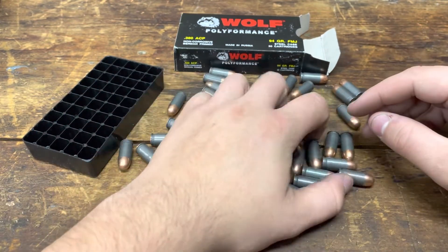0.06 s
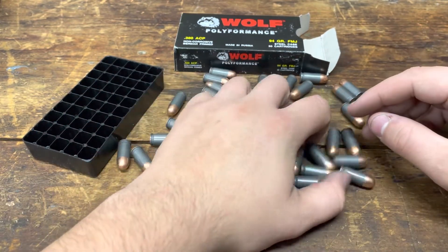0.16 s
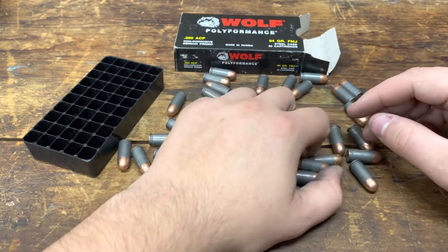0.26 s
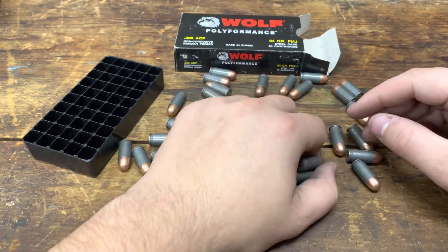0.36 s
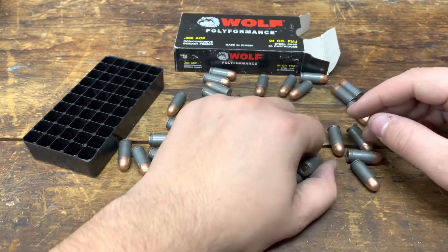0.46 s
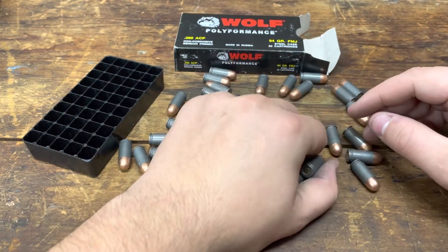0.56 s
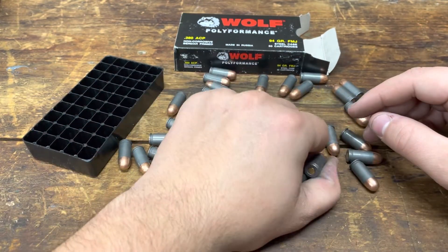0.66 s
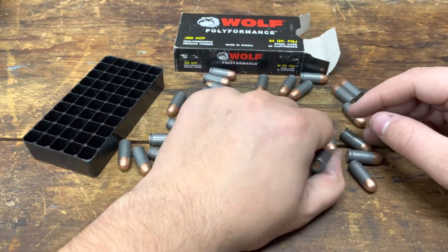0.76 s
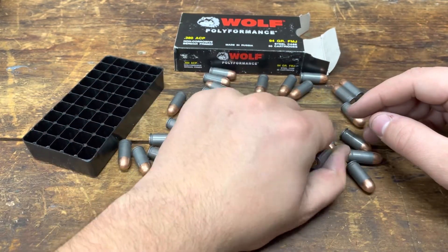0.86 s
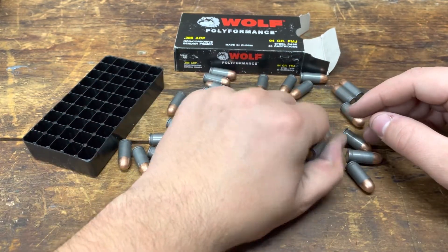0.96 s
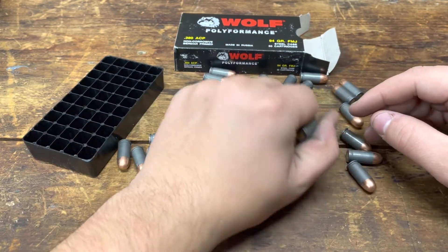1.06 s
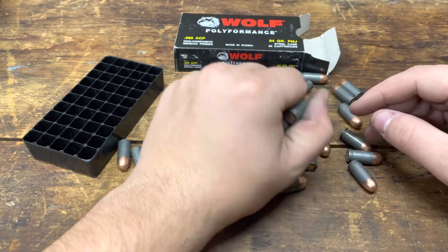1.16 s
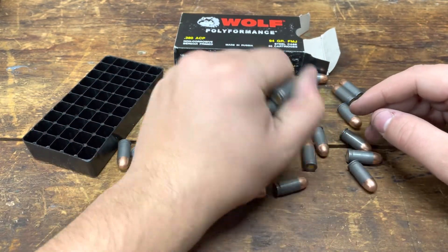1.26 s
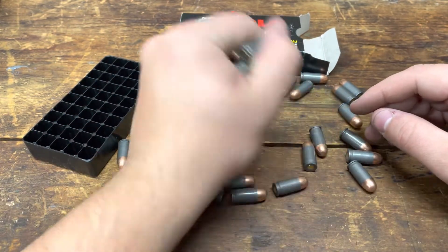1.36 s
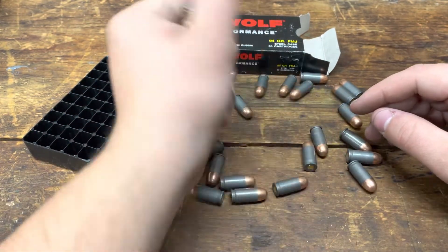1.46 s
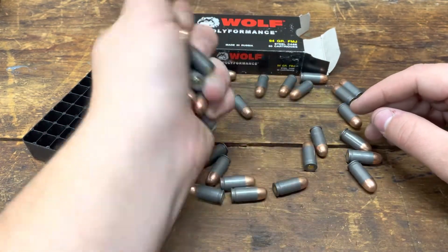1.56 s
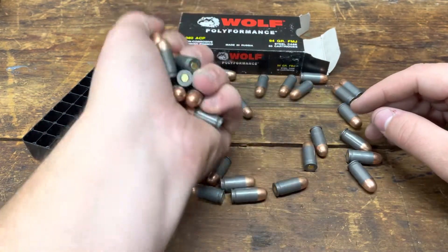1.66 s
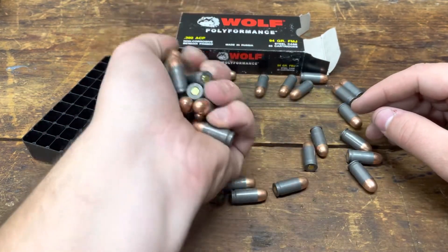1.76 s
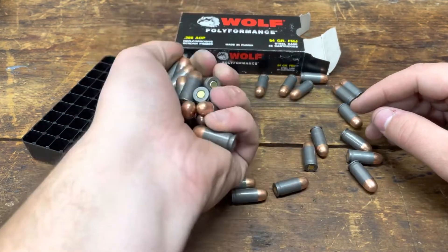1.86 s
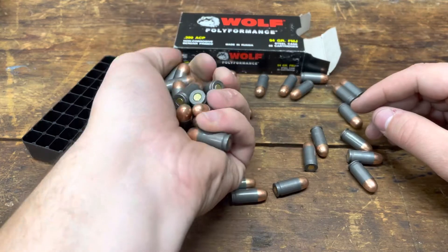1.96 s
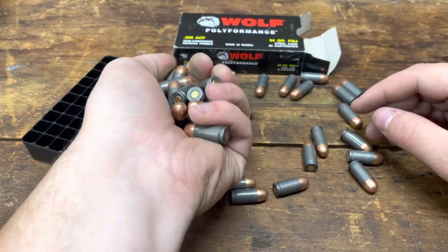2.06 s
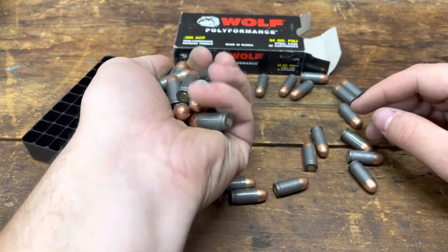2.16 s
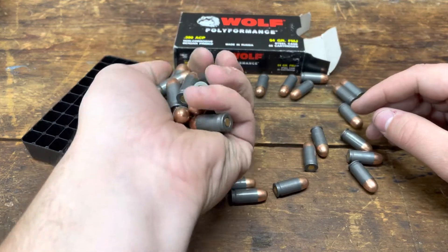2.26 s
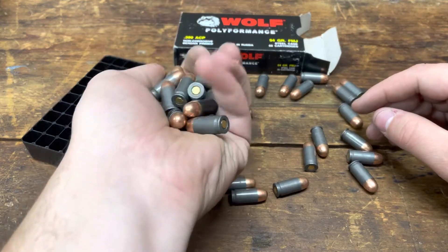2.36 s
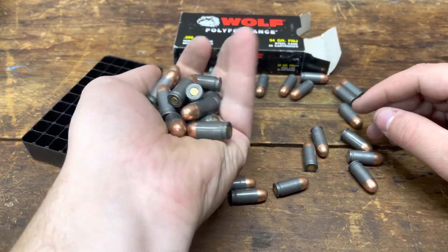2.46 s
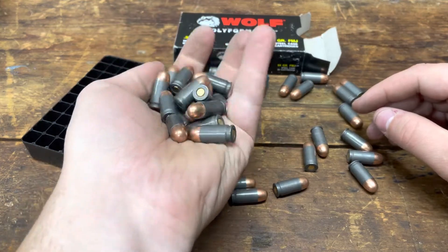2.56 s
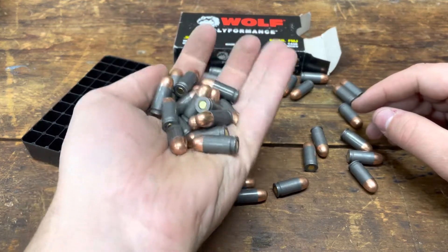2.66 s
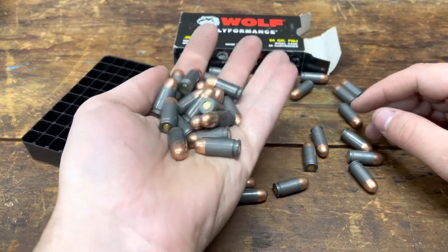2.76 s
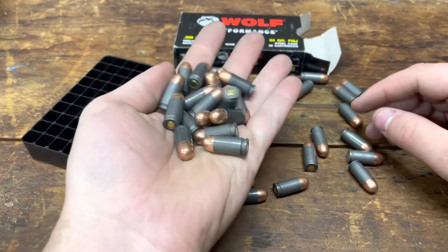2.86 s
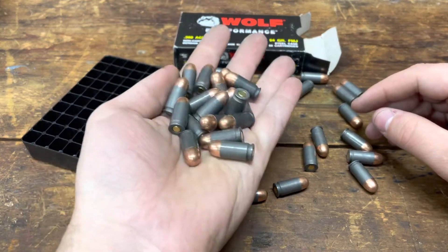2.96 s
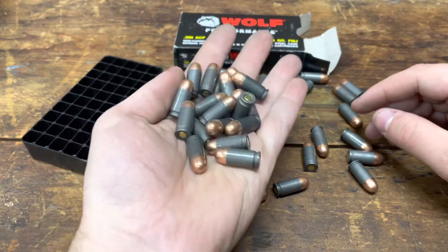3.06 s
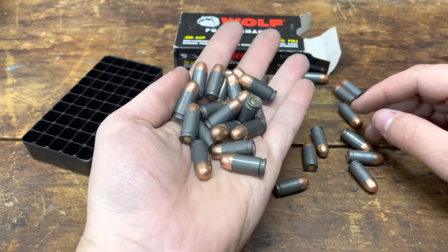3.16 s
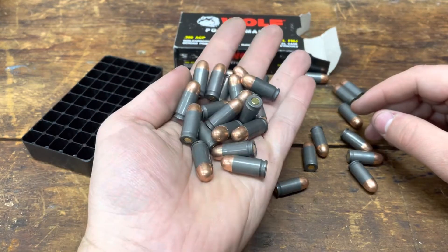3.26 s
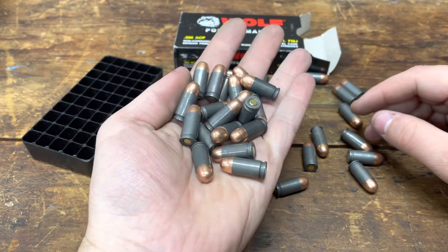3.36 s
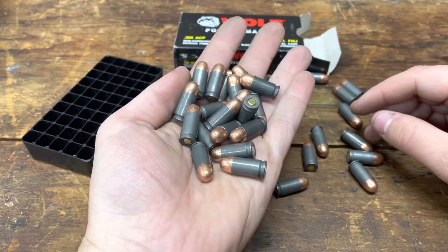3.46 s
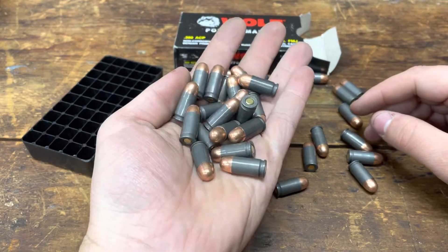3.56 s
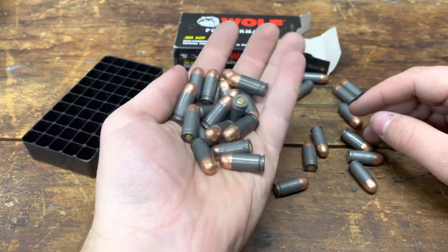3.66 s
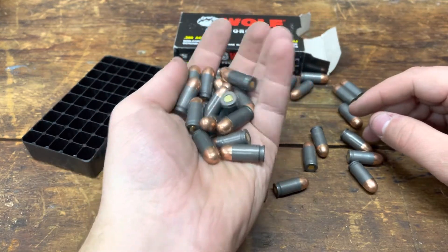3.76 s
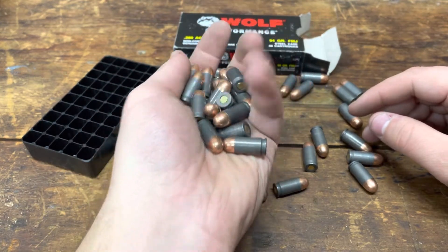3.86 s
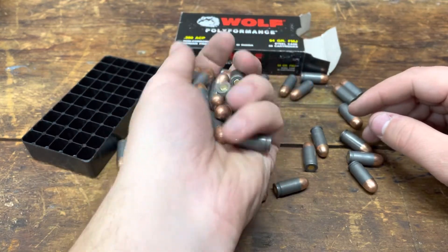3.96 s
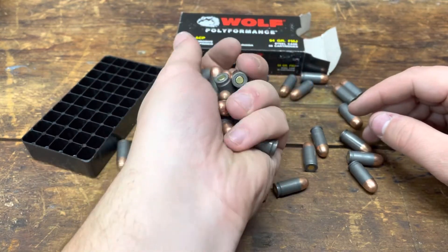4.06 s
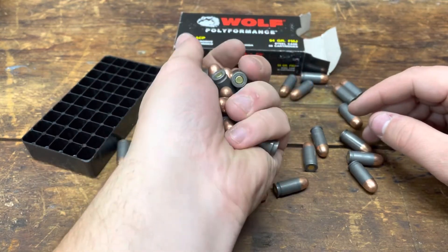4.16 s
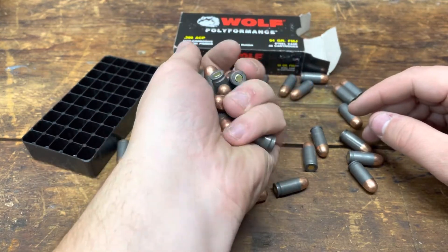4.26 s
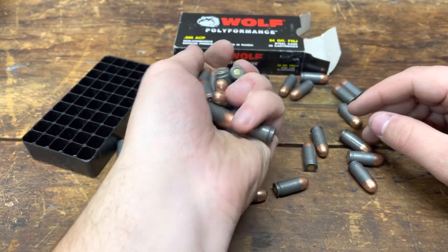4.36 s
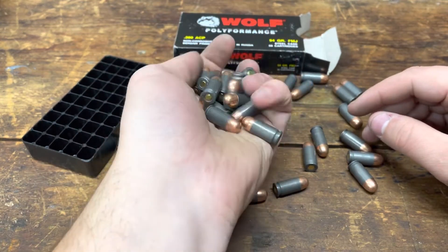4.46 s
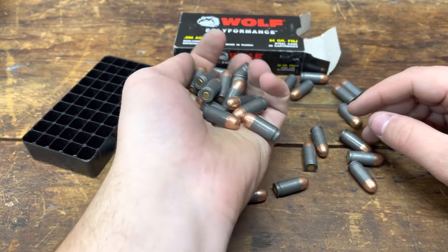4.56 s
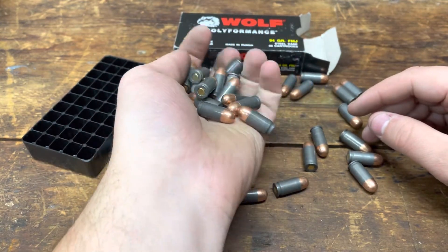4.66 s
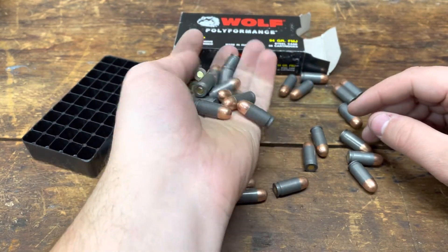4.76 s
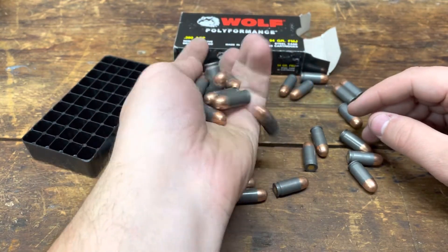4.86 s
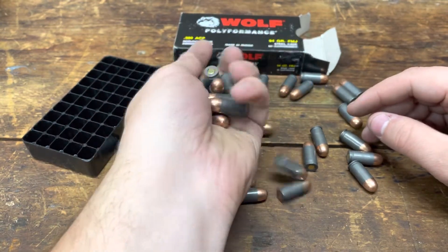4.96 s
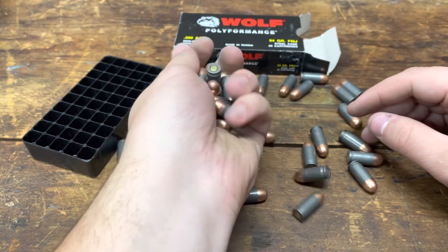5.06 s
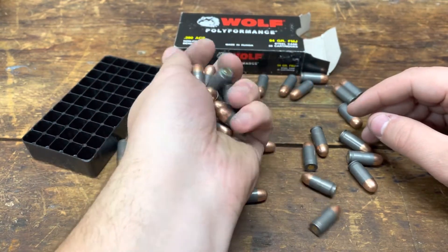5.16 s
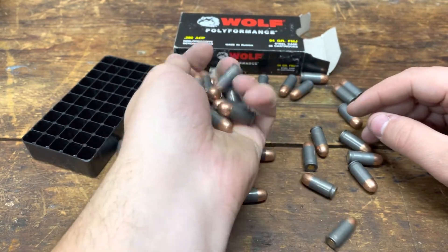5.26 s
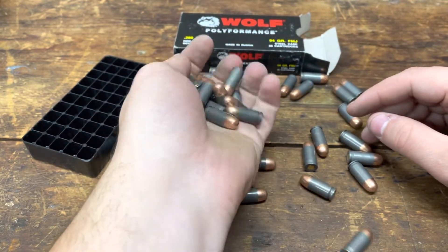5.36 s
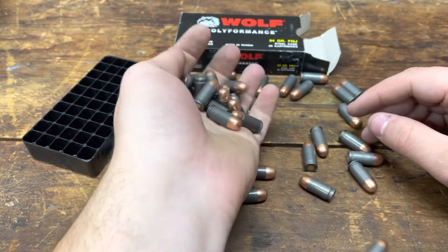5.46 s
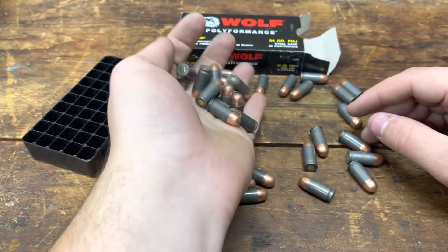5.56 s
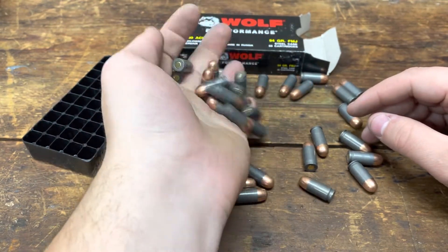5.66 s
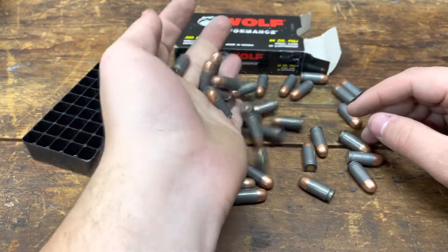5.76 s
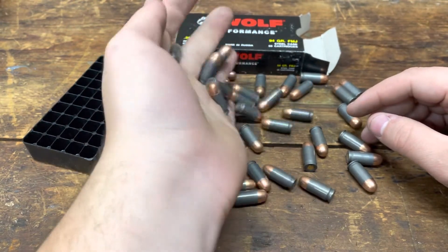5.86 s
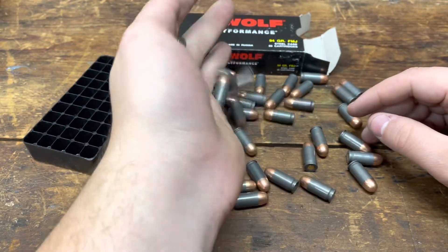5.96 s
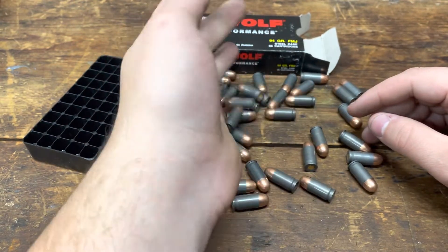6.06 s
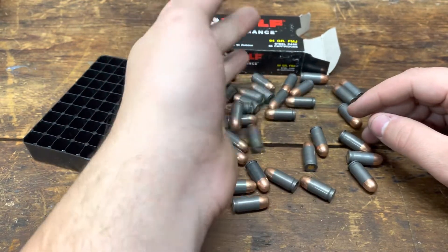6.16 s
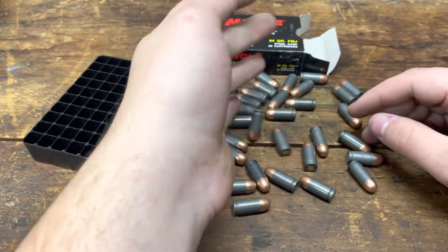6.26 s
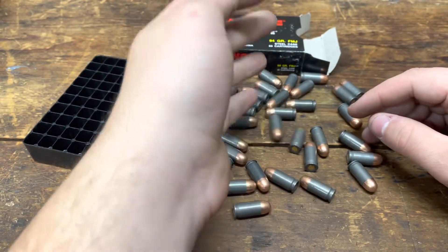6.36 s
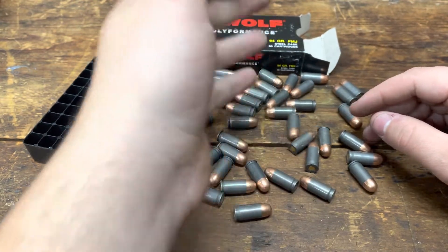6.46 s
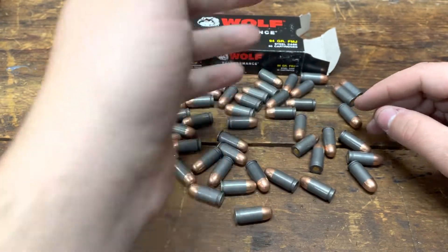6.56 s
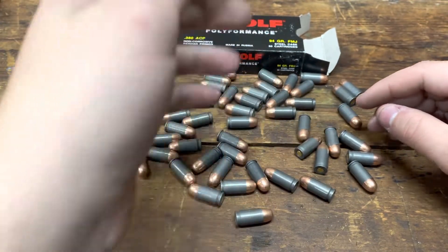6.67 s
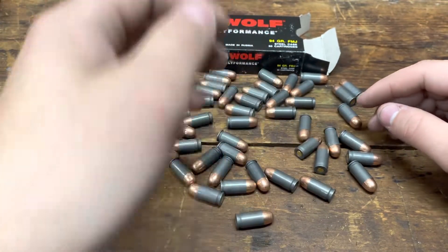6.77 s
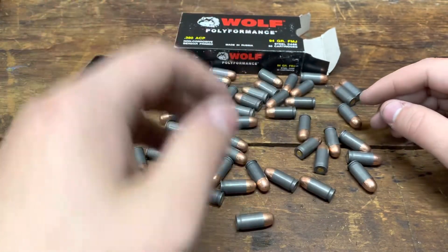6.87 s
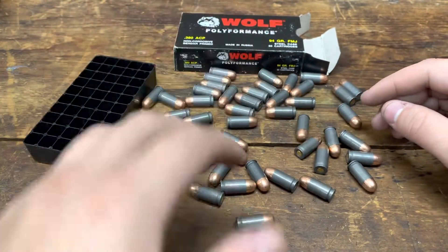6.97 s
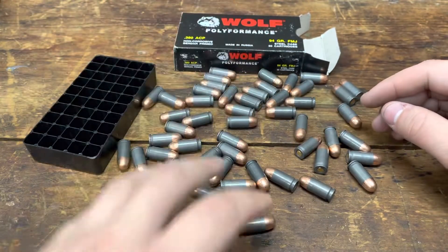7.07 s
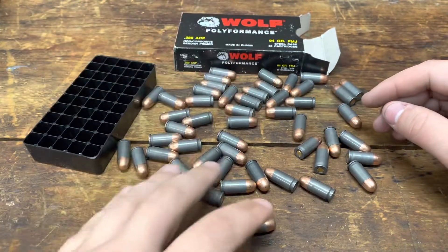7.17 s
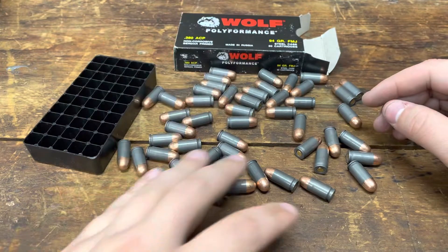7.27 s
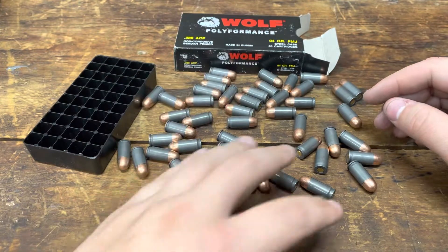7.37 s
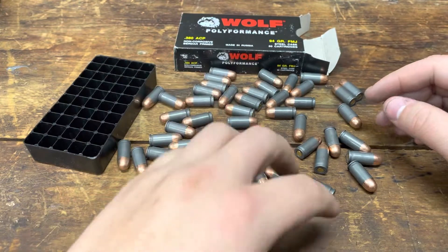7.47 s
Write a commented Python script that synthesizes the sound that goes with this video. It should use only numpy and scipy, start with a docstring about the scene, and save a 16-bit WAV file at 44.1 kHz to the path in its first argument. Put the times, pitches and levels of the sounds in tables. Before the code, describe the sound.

Close stereo pickup in a small quiet room. Steel cartridges are raked over a wooden table with dull knocks and metallic ticks, then lifted with one sharper rap. Sparse, light clinks follow as they turn in the palm. A few fall with a heavy thump, then the whole handful pours out in a dense clatter, thinning to near silence with soft skin brushes.

```python
"""Cartridges raked over a wooden table

A hand rakes steel-cased cartridges over a wooden table, lifts a fistful, shakes it and pours it back.
Blows on the wood are ringing plank modes with a contact crack; ticks of case on case are short noise blips.
Random streams of small contacts make the rolling and rattling, and shaped noise the brushing of skin.
A small room answers with a sparse random tail, over a steady room tone."""
import sys
import numpy as np
from scipy import signal
from scipy.fft import rfft, irfft, next_fast_len
from scipy.io import wavfile
from scipy.ndimage import uniform_filter1d

SR = 44100
rng = np.random.default_rng(int(sys.argv[2]) if len(sys.argv) > 2 else 0)


def unload_wav(signal):
    """Save mono or channel-first audio to the path in sys.argv[1] as 16-bit WAV at rate SR, clipped to [-1, 1]."""
    wavfile.write(
        sys.argv[1],
        SR,
        np.round(np.clip(np.atleast_2d(signal).T, -1, 1) * 32767).astype(np.int16),
    )


N = 332073

# lowest plank modes: pitch_hz [Hz], width_hz [Hz], level_db [dB, relative]
PLANK_MODES = [(105.6, 25, 1.5), (132.6, 89, -5.5), (190.6, 46, -4.5), (266.4, 51, 1)]


def table():
    """Knocks over the rumble of rolling rounds, with the deepest bass filtered off."""
    # cartridges striking the table: start_s [s], level_db [dB], sharpness [dB per octave],
    # edge_db [dB, steel edge relative to the wood]
    strikes = [(0.001, -18.5, -1.5, -18.5), (0.037, -23, -6, -19.5), (0.114, -30, -7, -19.5),
               (0.174, -12.5, -1.5, -19.5), (0.203, -20, -5, -19), (0.288, -14.5, 0, -17),
               (0.303, -17.5, -3.5, -14.5), (0.317, -21, -1, -18.5), (0.558, -26, -6, -23.5),
               (0.655, -26.5, -9, -21), (0.672, -16.5, -3, -23), (0.685, -17.5, -11, -22),
               (0.699, -19, -0.5, -11.5), (0.861, -28, -0.5, -4), (0.993, -38.5, -4, -15.5),
               (1.016, -45.5, -6, -18.5), (1.044, -47, 2, -17.5), (1.364, -32, 4.5, -19),
               (1.383, -20.5, -2, -18), (1.401, -7.5, 8, -8), (1.417, -25, 0, -18.5),
               (1.436, -17.5, 0.5, -15.5), (1.476, -33, 9, -18), (4.916, 2.5, 1.5, -16),
               (4.959, -14.5, 0, -27.5), (4.978, -28.5, 2, -19.5), (5.003, -2.5, 4, -3.5),
               (5.053, -13, -8.5, -20), (5.086, -11.5, 1, -20), (5.114, -20.5, 0, -21),
               (5.133, -22, 3, -17), (5.196, -20.5, -2, -17.5), (5.346, -14, 5, -16),
               (5.36, -15, -2.5, -19.5), (5.377, -16.5, -6, -20), (5.399, -24, -6, -21),
               (5.537, -13, 2.5, -17.5), (5.632, -20.5, 1.5, -17), (5.658, -6, -4, -22),
               (5.67, -8, -3.5, -22.5), (5.709, 1.5, 1.5, -15.5), (5.726, -14, -3.5, -17.5),
               (5.753, -8, -0.5, -18.5), (5.773, -4.5, -1, -21), (5.795, -9.5, 4.5, -18.5),
               (5.813, -8, 0.5, -17.5), (5.841, -9.5, 4, -7), (5.871, -14, 8.5, -19),
               (5.927, -15.5, 3, -18), (5.942, -13.5, -1, -18), (5.954, -5, 1.5, -18),
               (5.987, -13.5, 5.5, -15), (6.007, -6.5, 3, -17), (6.028, -9.5, 1, -15),
               (6.053, -14, 2, -20.5), (6.084, -12, 1, -21), (6.116, -12.5, 2.5, -21.5),
               (6.141, -11.5, 0.5, -20), (6.17, -0.5, 2, -9.5), (6.187, -9.5, -4, -32),
               (6.213, -17, -5, -21.5), (6.232, -22, -2.5, -19), (6.286, -11.5, 4, -13),
               (6.309, -25, -3, -22), (6.33, -26, -2, -22), (6.366, -24.5, 0, -21), (6.479, -16, -2.5, -20),
               (6.498, -28.5, -2, -34), (6.53, -28, -1.5, -32), (7.34, -53, -2, -23),
               (7.406, -63, 8, -15.5), (7.44, -54.5, -1, -17)]
    # rolling and sliding on the wood, one curve per stretch: time_s [s], level_db [dB]
    rolling = [
        [(0.0, -41), (0.124, -41), (0.5, -53), (0.827, -53.5), (1.25, -93)],
        [(1.33, -74), (1.554, -56), (1.7, -73.5)],
        [(4.9, -40.5), (5.08, -41.5), (5.33, -50), (5.35, -43), (5.417, -50.5), (5.63, -52), (5.65, -41),
         (5.8, -36.5), (5.91, -46), (6.031, -44), (6.25, -41), (6.45, -48.5), (6.52, -47), (6.8, -74.5)],
        [(7.3, -84), (7.386, -63.5), (7.53, -71)],
    ]
    mix = np.zeros((2, N))
    pan_luck = rng.standard_normal(len(strikes))
    for (start_s, level_db, tilt_db, edge_db), luck in zip(strikes, pan_luck):
        boom_db = -19.5 - 0.4612 * level_db  # soft blows are mostly boom
        blow = knock(boom_db, tilt_db, edge_db, size=6000)
        add(mix, start_s, amp(level_db) * blow, pan_db=0.6 + 1.6 * luck)

    def small_bump():
        return knock(boom_db=-31.0, tilt_db=-6.3, edge_db=-23.5, size=2000)

    def small_boom():
        return ring(PLANK_MODES, spread_db=3.6, apart=0.15, rise_s=0.0026, size=5000)

    bumps = grains(250, 1.5, [small_bump] * 8)
    booms = grains(220, 3.0, [small_boom] * 3)
    mix += amp(curve(rolling, column=1)) * (bumps + amp(-3.5) * booms)
    highpass = signal.butter(2, 68.0, "high", fs=SR, output="sos")
    return signal.sosfilt(highpass, mix)


def knock(boom_db, tilt_db, edge_db, size):
    """Contact crack, ringing planks and a low boom; a sharper blow wakes the higher modes."""
    # table top modes: pitch_hz [Hz], width_hz [Hz], level_db [dB, relative]
    top_modes = [(310, 68, -5.5), (427.8, 53, -1.5), (536, 32, -4), (710, 220, -12.5), (852, 96, -11.5),
                 (987, 31, -10.5), (1042, 77, -4), (1183, 46, -4), (1320, 40, -5), (1495, 66, -10),
                 (1580, 33, -6), (1830, 150, -10.5), (2160, 180, -4.5), (2243, 190, -2), (2637, 60, -8),
                 (2997, 75, -10), (3450, 83, -10)]
    # contact noise: pitch_hz [Hz], level_db [dB, relative]
    contact_noise = [(200, -31), (700, 5.5), (1300, 8), (2800, -5), (5000, -20), (7000, -31), (12000, -41)]
    # steel edge on wood: pitch_hz [Hz], level_db [dB, relative]
    steel_edge = [(2500, -20.5), (3500, -5), (4800, 6.5), (5600, -1), (7000, -7.5), (9000, -31.5),
                  (13000, -42.5)]
    boom_tilt = 0.85  # share of the sharpness that reaches the lowest modes
    top = [(hz, width, db + tilt_db * np.log2(hz / 1200)) for hz, width, db in top_modes]
    low = [(hz, width, db + boom_tilt * tilt_db * np.log2(hz / 180)) for hz, width, db in PLANK_MODES]
    contact = [(hz, db + tilt_db * np.log2(min(hz, 3500) / 1200)) for hz, db in contact_noise]

    wood = ring(top, spread_db=1.1, apart=0.94, rise_s=0.0012, size=2000)
    wood = peaked(wood + amp(1.5) * crack(contact, spread_s=0.003014, apart=0.55, size=2000))
    wood = wood + amp(edge_db) * crack(steel_edge, spread_s=0.0012, apart=0.13, size=2000)
    wood = np.pad(wood, [(0, 0), (0, size - wood.shape[1])])
    boom = ring(low, spread_db=3.7, apart=0.056, rise_s=0.0038, size=size)
    return wood + amp(boom_db) * boom


def ring(modes, spread_db, apart, rise_s, size):
    """Decaying modes of the wood; random strengths and side phases stand for where the blow lands."""
    hz, width_hz, db = np.array(modes).T[:, :, None]
    detune, sign, strength, side = rng.standard_normal((4, len(modes), 1))
    t = np.arange(size) / SR
    half_sides = np.array([0.5, -0.5])[:, None, None]
    phase = 2 * np.pi * hz * (1 + 0.02 * detune) * t + apart * side * half_sides
    decay = np.exp(-np.pi * np.maximum(width_hz, 8) * t)  # a wider mode dies sooner
    waves = np.sign(sign) * amp(db + spread_db * strength) * np.sin(phase) * decay
    rise = 1 - np.exp(-(t / rise_s) ** 2)
    return peaked(waves.sum(1) * rise)


def crack(points, spread_s, apart, size):
    """A click of smooth spectrum whose bands arrive scattered in time, a little differently per side."""
    hz = np.fft.rfftfreq(size, 1 / SR)
    knot_hz = np.geomspace(150, SR / 2, 70)
    knots_s = rng.exponential(spread_s, 70) * amp(apart * rng.standard_normal((2, 70)))
    scatter_s = np.array([np.interp(hz, knot_hz, side) for side in knots_s])
    late_s = 0.0008 + scatter_s / (1 + hz / 5000)  # the treble is scattered less
    phase = -2 * np.pi * np.cumsum(late_s, 1) * hz[1]  # phase is the running sum of the delay
    return peaked(irfft(amp(read(points, hz)) * np.exp(1j * phase), size))


def heap():
    """Ticks of case on case, on average a little to the left, over the fine rattle of the heap."""
    # case ticking on case: start_s [s], level_db [dB], rim_db [dB, upper ring relative to main ring],
    # body_db [dB, lower body relative to the rings]
    ticks = [(0.0145, -28, 2, -7.5), (0.035, -24.5, -14.5, -15), (0.077, -32, -0.5, -25),
             (0.129, -32, -5, -20.5), (0.1513, -25, -7.5, -20), (0.166, -20.5, -9.5, -16),
             (0.1746, -28, -14, -15.5), (0.189, -13.5, -6, -15.5), (0.214, -24.5, -6, -18),
             (0.222, -20.5, -5.5, -16.5), (0.2756, -27, -8.5, -20.5), (0.2814, -28.5, -2, -14.5),
             (0.4281, -31, -5, -23), (0.5213, -26.5, -6.5, -7), (0.5653, -25, -13, -10),
             (0.6802, -20, -2, -26), (0.7012, -24, -6, -18), (0.75, -29, -3, -10), (0.8642, -26, -5, -24),
             (0.9185, -39, -6, -11), (0.9305, -34.5, -9, -14.5), (0.9488, -34, -20, -12.5),
             (0.9538, -38, -17, -17.5), (1.0107, -39, -15, -18.5), (1.249, -60.5, -3, -15.5),
             (1.6386, -36.5, -16, -5), (1.6494, -29.5, 2, -20), (1.697, -26, 5, -16), (1.7036, -35, 1, -16),
             (1.7242, -28, -9, -16), (1.7537, -32, -5.5, -15), (1.7666, -26.5, -3, -21),
             (1.775, -34, 3, -15), (1.7854, -42, 0, -15), (1.7954, -35.5, 5, -13), (1.8012, -30, -6, -18),
             (1.8405, -30.5, -15, -14), (1.8565, -36, -4, -10.5), (1.898, -39, 2.5, -16),
             (1.992, -36.5, -9, -22), (2.0512, -42.5, -12, -12.5), (2.0899, -17.5, -5, -31),
             (2.0936, -30, -7, -21.5), (2.1286, -27, 4.5, -26), (2.2884, -49, -3, -17),
             (2.352, -41, -0.5, -29), (2.4573, -28.5, -9.5, -16.5), (2.4815, -22.5, -9, -17),
             (2.493, -43, 5, -16), (2.5375, -36, -6, -11), (2.589, -24.5, -4, -25), (2.597, -36, 0, -11),
             (2.6535, -44, -9, -6), (2.679, -35.5, -25, -12), (2.7482, -29.5, -3, -36),
             (2.7734, -42, -14, -16), (2.797, -40, -8, -8), (2.8175, -32.5, -4, -20),
             (2.8514, -30, -3, -19), (2.8823, -44, -4, -14), (2.9107, -37.5, -10, -15),
             (2.9762, -37, -13, -14), (3.0144, -26.5, -8.5, -11), (3.0408, -41, -17, -22),
             (3.0936, -38, -17, -11), (3.101, -46, -8, -22), (3.1708, -41, 0, -18),
             (3.5553, -50.5, -4.5, -13), (3.572, -51.5, -13, -8), (3.6155, -41.5, -31, -13.5),
             (3.6725, -35, -18.5, -20), (3.7288, -39, -0.5, -20), (3.7454, -42.5, -5, -15),
             (3.775, -43, -7, -15), (3.795, -30, 3.5, -22), (3.8375, -27.5, -1, -16),
             (3.8643, -32, -6, -23), (3.872, -33.5, -6, -16), (3.8993, -30, -11, -28),
             (3.903, -40, -3, -19), (3.9132, -38, -4, -7), (3.926, -26.5, -7, -13),
             (3.936, -26.5, -6, -10.5), (3.959, -34.5, 0, -12), (3.9644, -42, 2, -13), (3.991, -37, 7, -6),
             (4.0003, -26, 3.5, -17.5), (4.0106, -36, -4, -5.5), (4.028, -28.5, -10, -14),
             (4.2207, -46, -13.5, -14), (4.236, -42, -15, -12), (4.258, -34, -5, -18),
             (4.2845, -31.5, -3, -9.5), (4.2983, -35, -1, -16), (4.3207, -23.5, -4, -17.5),
             (4.3438, -33, -4, -26), (4.35, -19.5, -5.5, -16), (4.3563, -38, -6, -18),
             (4.371, -32, -2, -13), (4.391, -33.5, -10, -11), (4.427, -35, -4, -12.5),
             (4.4552, -32, 4, -17.5), (4.4786, -39.5, -2.5, -18), (4.562, -45.5, -3, -22),
             (4.6213, -37, -1.5, -26.5), (4.679, -31, 0.5, -24), (4.7003, -32, 2, -19),
             (4.7242, -31, -5, -25), (4.7322, -20.5, -1.5, -28.5), (4.7528, -27, 2, -22),
             (4.771, -29.5, -6, -19.5), (4.786, -26, -4.5, -20), (4.822, -26, 3.5, -22),
             (4.8274, -30, -2, -20), (4.8494, -20, -3, -20), (4.86, -24.5, -6.5, -26.5),
             (4.8727, -21, -6, -20.5), (4.8826, -31.5, -6, -26), (5.111, -32.5, 0, -16),
             (5.1922, -27, -9, -12), (5.2126, -25, -7.5, -17.5), (5.242, -26.5, -4, -17.5),
             (5.2676, -28.5, -3, -14.5), (5.3, -23.5, -2.5, -16.5), (5.308, -33, -5, -19),
             (5.3186, -33.5, -3, -16.5), (5.3337, -26, -4.5, -17), (5.3914, -28.5, -9, -13),
             (5.4165, -33.5, -2, -14.5), (5.436, -27.5, -4, -17), (5.455, -37.5, 4, -16.5),
             (5.498, -41, -10, -16), (5.5361, -18, 0, -13.5), (5.5825, -27, -3.5, -18),
             (5.591, -22.5, -2, -14), (5.6128, -27, -1.5, -16), (5.6222, -16.5, -2, -17),
             (5.6321, -18.5, 4, -17.5), (5.6648, -19, 3, -17.5), (5.7199, -10.5, -15, -16),
             (5.9277, -27.5, -16, -16), (5.948, -19, -2, -12), (5.981, -23.5, 7, -24),
             (5.9957, -23, 24, -20), (6.0076, -16.5, -11.5, -21), (6.022, -23.5, 1, -18.5),
             (6.1157, -23, -2, -17), (6.1418, -24.5, -1.5, -17), (6.2133, -25, 0, -17),
             (6.353, -29.5, 0, -16), (6.3989, -30.5, 2, -20), (6.4752, -42, 4, -14), (6.5228, -42, 13, -21),
             (6.5987, -45, -4, -16), (6.6594, -61, -6, -16), (6.7175, -45.5, -9, 6.5),
             (7.4937, -54, -11.5, -11)]
    # small ticks and scrapes, one curve for each stir of the hand: time_s [s], level_db [dB]
    rattle = [
        [(0.0, -54), (0.158, -46), (0.36, -57.5), (0.85, -71), (1.1, -99)],
        [(1.55, -65), (1.798, -74.5), (2.03, -81), (2.126, -69), (2.4, -83)],
        [(2.42, -72.5), (2.674, -69), (2.902, -79), (3.034, -88), (3.2, -100)],
        [(3.55, -99), (3.624, -94.5), (3.806, -67), (3.868, -68), (4.12, -74)],
        [(4.2, -73), (4.288, -61), (4.43, -63), (4.52, -72)],
        [(4.6, -77), (4.702, -73), (4.838, -42.5), (5.13, -62), (5.55, -55.5)],
        [(5.56, -51.5), (5.724, -43.5), (6.068, -47), (6.448, -62.5), (6.7, -80)],
    ]
    mix = np.zeros((2, N))
    pan_luck = rng.standard_normal(len(ticks))
    for (contact_s, level_db, rim_db, body_db), luck in zip(ticks, pan_luck):
        start_s = contact_s - 66 / SR  # early, because the blip takes 88 samples to swell
        add(mix, start_s, amp(level_db) * tick(rim_db, body_db), pan_db=0.75 + 2.2 * luck)

    def small_tick():
        return tick(rim_db=-4.0, body_db=-8.0)

    return mix + amp(curve(rattle, column=1)) * grains(470, 5.3, [small_tick] * 10)


def tick(rim_db, body_db):
    """Held steel rings for about a millisecond, then chatters faintly."""
    # main ring of a case: pitch_hz [Hz], level_db [dB, relative]
    case_ring = [(700, -41.5), (1600, -29), (3400, -18), (4500, -3), (5900, -0.5), (7400, -1), (8600, -19)]
    # upper ring: pitch_hz [Hz], level_db [dB, relative]
    upper_ring = [(7500, -26.5), (8800, 2), (10500, 0.5), (12500, -3.5), (14500, -11), (16500, -26)]
    # lead-filled nose: pitch_hz [Hz], level_db [dB, relative]
    nose = [(600, -26), (1200, 1.5), (1900, 7), (3000, 4.5), (4000, 0), (6000, -33.5)]
    steel = peaked(pip(case_ring, 0.00097) + amp(rim_db) * pip(upper_ring, 0.0011))
    one = steel + amp(body_db) * pip(nose, 0.0011)
    return touches(one, count=4, within_s=0.014, fade_db=-17.5)


def pip(points, width_s):
    """A blip of coloured noise under a bell-shaped swell that peaks two milliseconds in."""
    t = np.arange(-88, 168) / SR
    noise = coloured(pair(len(t), 0.87), points)
    return peaked(noise * np.exp(-(t / width_s) ** 2))


def touches(sound, count, within_s, fade_db):
    """A contact is rarely single: weaker touches follow at random gaps."""
    comb = np.zeros(round(within_s * SR) + 2)
    late = rng.random(count)  # share of the time span
    touch_db = fade_db * (late * 0.94 + 0.5 * rng.random(count))
    comb[(late * within_s * SR).astype(int)] = amp(touch_db)
    comb[0] = 1  # the first contact
    return signal.oaconvolve(sound, comb[None], axes=1)


def grains(per_s, spread_db, makers):
    """A random stream of small contacts, a few of them large, evened to a running rms near 1."""
    out = np.zeros((2, N))
    for make in makers:
        struck = rng.random(N) < per_s / SR / len(makers)
        sizes = amp(spread_db * np.minimum(rng.exponential(1, N), 4))
        out += signal.oaconvolve((struck * sizes)[None], make(), axes=1)[:, :N]
    running_power = uniform_filter1d((out ** 2).mean(0), SR // 4)  # over a quarter second
    return out / np.sqrt(running_power + 1e-9)


def brushes():
    """Skin brushing skin or wood: banded noise with more or less squeak, swelling quickly and fading."""
    # brushes: start_s [s], length_s [s], level_db [dB, before the swell], brightness [dB per octave],
    # squeak_db [dB, relative to the swish]
    strokes = [(1.333, 0.092, -61, -3, -20), (2.471, 0.3, -59.5, 2.5, -12), (3.016, 0.061, -64, -6, -20),
               (3.999, .08, -66, -11, -17), (6.814, .12, -55, -3, -25), (6.909, .16, -57, 4.5, -9),
               (7.032, 0.14, -55, -1.5, 1), (7.359, 0.36, -63.5, 0, -10)]
    # bands that a brush wakes: pitch_hz [Hz], width_hz [Hz], level_db [dB, relative]
    skin_bands = [(420, 470, 2.3), (876, 185, 0.5), (2100, 1000, -9.5), (5550, 7000, -17.5)]
    squeak_hz, squeak_width_hz = 1558, 240
    mix = np.zeros((2, N))
    for start_s, length_s, level_db, tilt_db, squeak_db in strokes:
        u = np.arange(0, 1, 1 / (length_s * SR))  # progress through the stroke
        f = np.fft.rfftfreq(len(u), 1 / SR)
        wide = 0
        for hz, width_hz, band_db in skin_bands:
            gain = amp(band_db + tilt_db * np.log2(hz / 1000))
            wide = wide + gain / (1 + ((f - hz) / width_hz * 2) ** 2)
        thin = 1 / (1 + ((f - squeak_hz) / squeak_width_hz * 2) ** 4)
        spectrum = evened(wide) + amp(squeak_db) * evened(thin)
        swish = irfft(rfft(rng.standard_normal(len(u))) * spectrum, len(u))
        swell = np.minimum(u / 0.14, 1) * (1 - u) ** 1.22
        add(mix, start_s, amp(level_db) * swish * swell, pan_db=0)
    return mix


def room(x, shared, decays):
    """Sparse taps of random sign, each band dying at its own speed; part of the tail is common to both sides."""
    taps = np.zeros((3, SR // 2))  # common, left, right
    # one tap at a random place in every 20 samples
    at = np.arange(100, SR // 2 - 20, 20) + rng.integers(0, 20, (3, (SR // 2 - 101) // 20))
    np.put_along_axis(taps, at, rng.choice([-1.0, 1.0], at.shape), 1)
    hz, t, z = signal.stft(taps, SR, nperseg=256)
    # long waves reach both ports alike
    same = np.maximum(np.clip(shared, 0, 1), np.exp(-(hz / 500) ** 2))[:, None]
    sides = same * z[0] + np.sqrt(1 - same ** 2) * z[1:]
    dying = amp(-60 * t / read(decays, hz)[:, None])
    tail = signal.istft(sides * dying, SR, nperseg=256)[1]
    tail = tail / np.linalg.norm(tail[0])
    return signal.fftconvolve(x.mean(0)[None], tail, axes=1)[:, :N]


def hush():
    """Steady room tone: noise partly alike on both sides, with slight patches in time and pitch."""
    # room tone spectrum: pitch_hz [Hz], level_db [dB, relative]
    tone = [(15, -33), (25, -10), (58, -2), (143, -11), (215, -14.5), (275, -14), (371, -21), (425, -17.5),
            (500, -24.5), (622, -19), (675, -23.5), (1410, -28.5), (16800, -47)]
    # left-right likeness: pitch_hz [Hz], likeness [-1 to 1]
    likeness = [(60, 0.89), (240, 1), (950, -0.67), (3770, 0.67), (15000, -0.19)]
    frames, hz = N // 256 + 5, np.fft.rfftfreq(1024, 1 / SR)
    a, b, c, d, patches = rng.standard_normal((frames, 513, 5)).T
    patches = uniform_filter1d(patches, 12, 0)  # across pitch
    patches = evened(uniform_filter1d(patches, 14, 1))  # along time
    same = np.clip(read(likeness, hz), -1, 1)[:, None]
    left = a + 1j * b
    right = same * left + np.sqrt(1 - same ** 2) * (c + 1j * d)
    z = np.array([left, right]) * amp(read(tone, hz)[:, None] + 1.7 * patches)
    noise = signal.istft(z, nperseg=1024, noverlap=768)[1][:, :N]
    return amp(-72) * evened(noise)


def amp(db):
    """Decibels to an amplitude factor."""
    return 10 ** (np.asarray(db) / 20)


def evened(x):
    """Scales to rms 1."""
    return x / np.sqrt(np.mean(x ** 2) + 1e-20)


def peaked(x):
    """Scales to peak 1."""
    return x / (abs(x).max() + 1e-12)


def read(points, hz):
    """Reads a table of values over pitch, along a logarithmic pitch axis."""
    f, value = np.transpose(points)
    return np.interp(np.log(hz + 1), np.log(f + 1), value)


def coloured(x, points):
    """Filters x by the spectrum of a table."""
    size = next_fast_len(x.shape[-1])
    gain = amp(read(points, np.fft.rfftfreq(size, 1 / SR)))
    return irfft(rfft(x, size) * gain, size)[..., :x.shape[-1]]


def pair(size, same):
    """Two channels of noise that are partly alike."""
    same = np.clip(same, 0, 1)
    noise = rng.standard_normal((3, size))
    return same * noise[0] + np.sqrt(1 - same ** 2) * noise[1:]


def add(mix, start_s, sound, pan_db):
    """Adds a sound to the mix; a positive pan makes the left louder than the right."""
    part = mix[:, round(start_s * SR):][:, :sound.shape[-1]]
    part += amp([[pan_db / 2], [-pan_db / 2]]) * sound[..., :part.shape[1]]


def curve(tables, column):
    """One column of several tables along the time axis; -120 dB between them."""
    t, out = np.arange(N) / SR, np.full(N, -120.0)
    for rows in map(np.array, tables):
        inside = (t >= rows[0, 0]) & (t <= rows[-1, 0])
        out[inside] = np.interp(t[inside], rows[:, 0], rows[:, column])
    return out


def scene():
    """Wood and steel, the short tail of the ticks, the answer of the room and its tone."""
    # dying of the room: pitch_hz [Hz], t60_s [s]
    room_decay = [(80, 0.29), (250, 0.36), (1500, 0.41), (4000, 0.42), (10000, 0.22)]
    # dying of the ticks among the fingers and nearby things: pitch_hz [Hz], t60_s [s]
    hand_decay = [(300, 0.07), (3000, 0.042), (10000, 0.02)]
    wood, steel = table() + brushes(), heap()
    walls = room(amp(-3.5) * wood + amp(-10.5) * steel, 0.56, room_decay)
    near = amp(-13.5) * room(steel, 1.0, hand_decay)
    return wood + steel + near + walls + hush()


def record(dry):
    """Two ports a little apart hear the treble out of step; loud blows overload softly; then the band limit."""
    # port spacing: pitch_hz [Hz], lead [radians by which the left port leads]
    port_lead = [(100, 0), (2000, 0), (4800, .5), (5800, -.1), (6900, -1.4), (7900, -3), (9000, -3.6),
                 (10400, -5.7), (11700, -6.3), (12700, -7.1), (14100, -9.2), (16500, -10)]
    size = next_fast_len(N + 2048)
    lead = read(port_lead, np.fft.rfftfreq(size, 1 / SR)) * np.array([[0.5], [-0.5]])
    heard = irfft(rfft(dry, size) * np.exp(1j * lead), size)[:, :N]
    heard = 0.95 * np.tanh(heard / 0.95)
    lowpass = signal.firwin(511, 16800, window=("kaiser", 9), fs=SR)  # cutoff in Hz
    return signal.oaconvolve(heard, lowpass[None], "same")


dry = scene()
out = record(dry)
unload_wav(out)
```